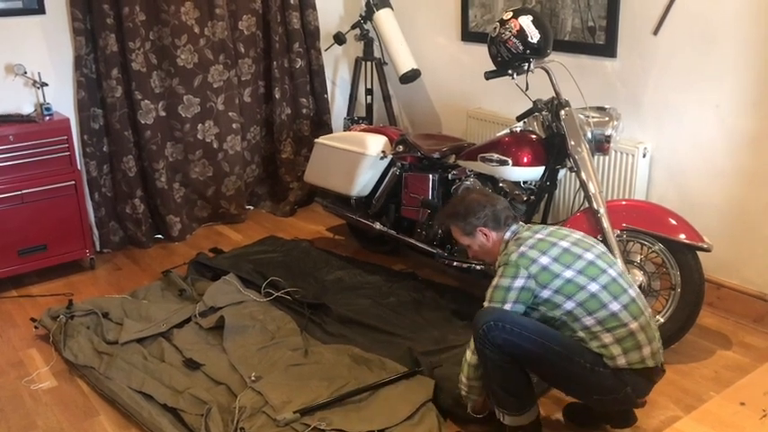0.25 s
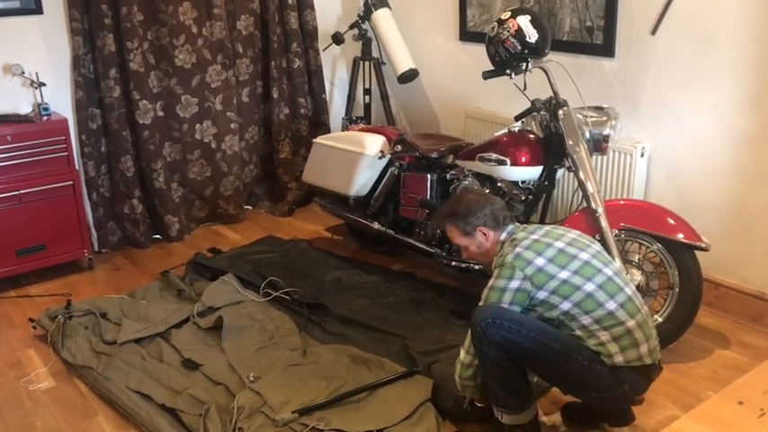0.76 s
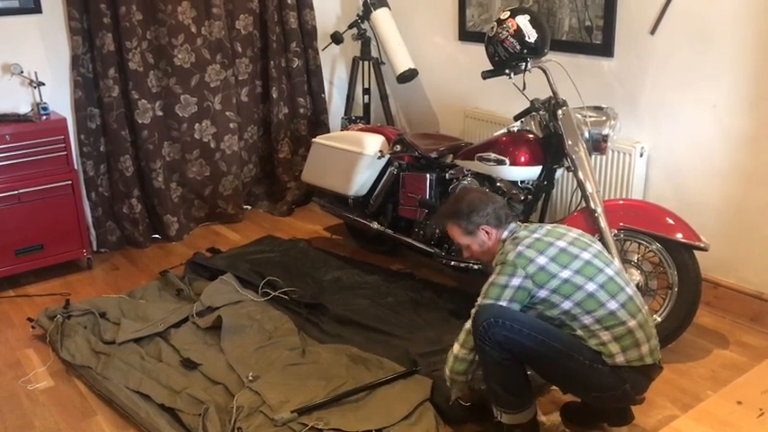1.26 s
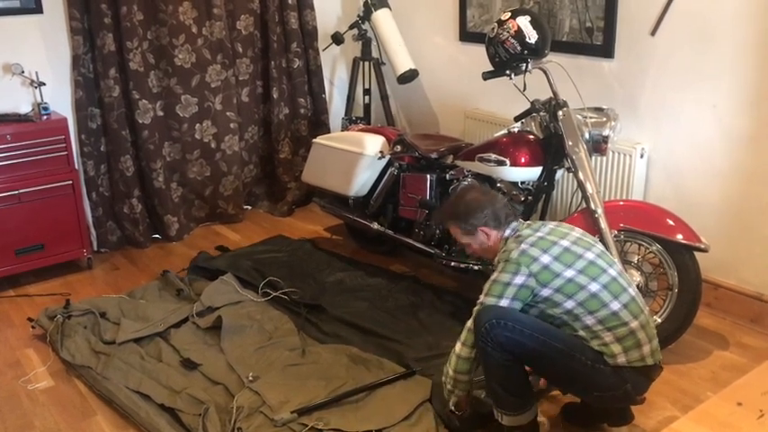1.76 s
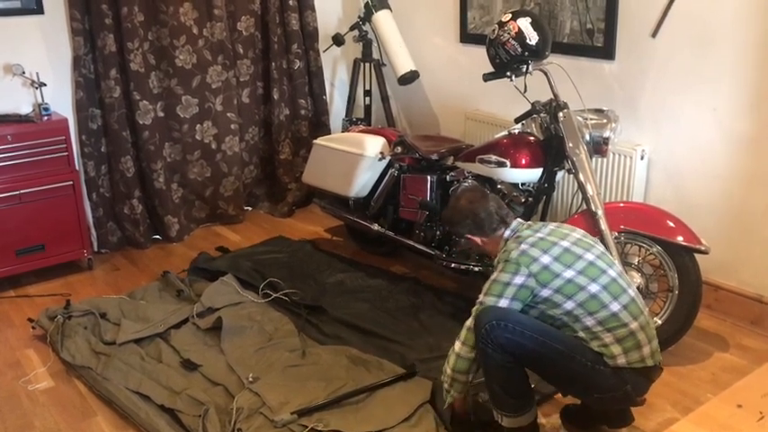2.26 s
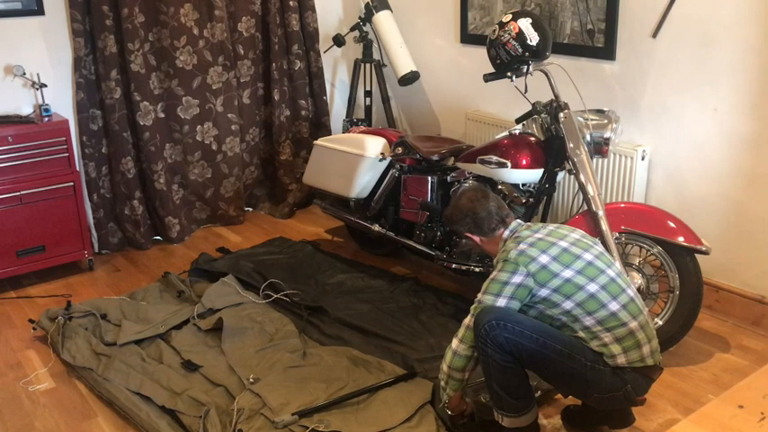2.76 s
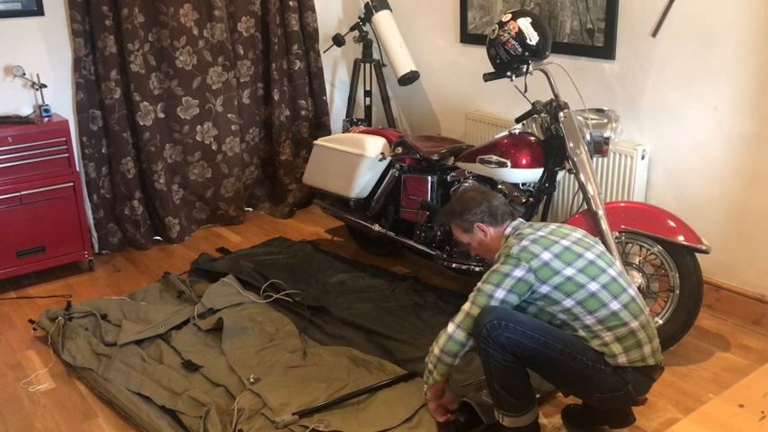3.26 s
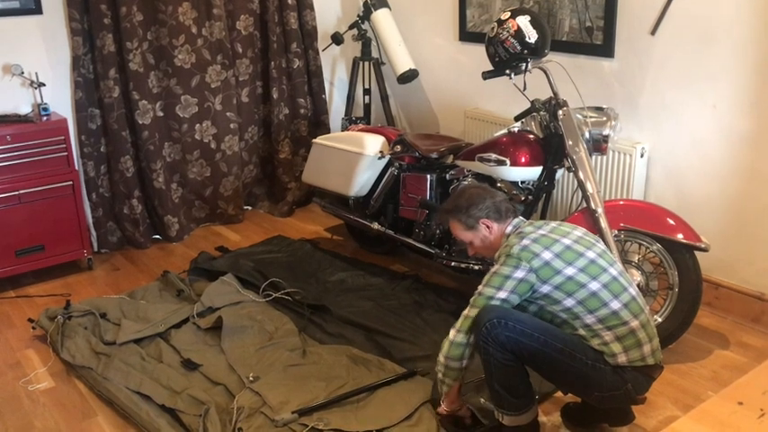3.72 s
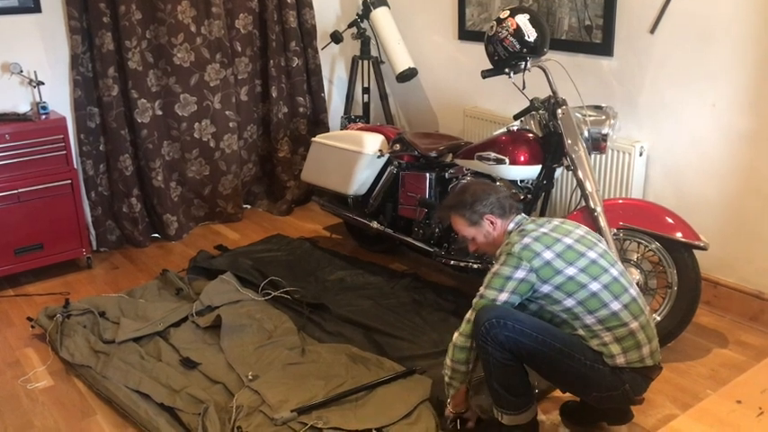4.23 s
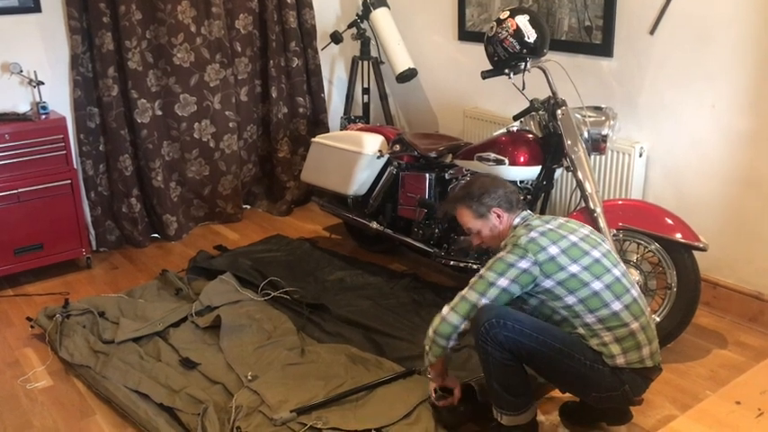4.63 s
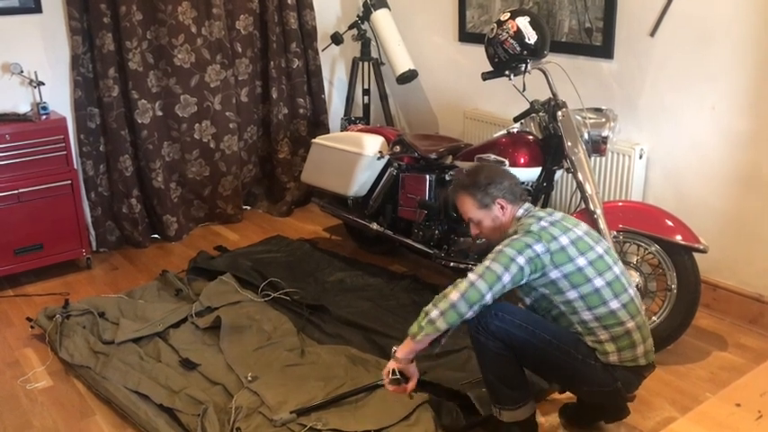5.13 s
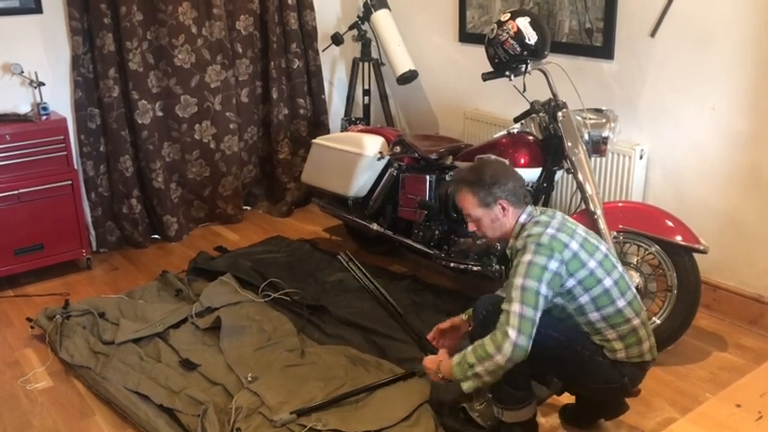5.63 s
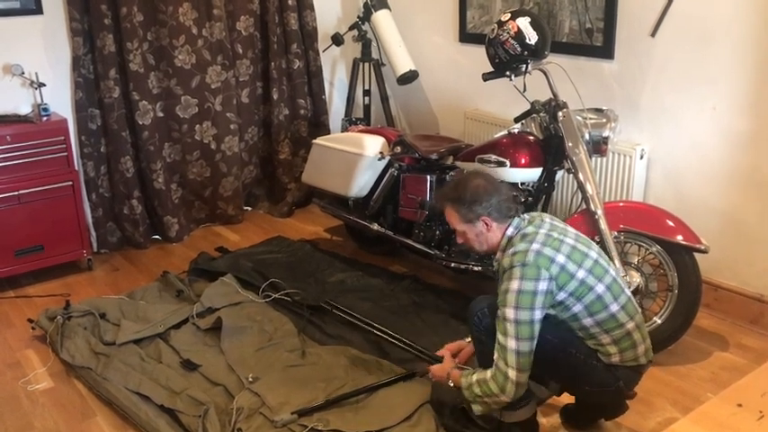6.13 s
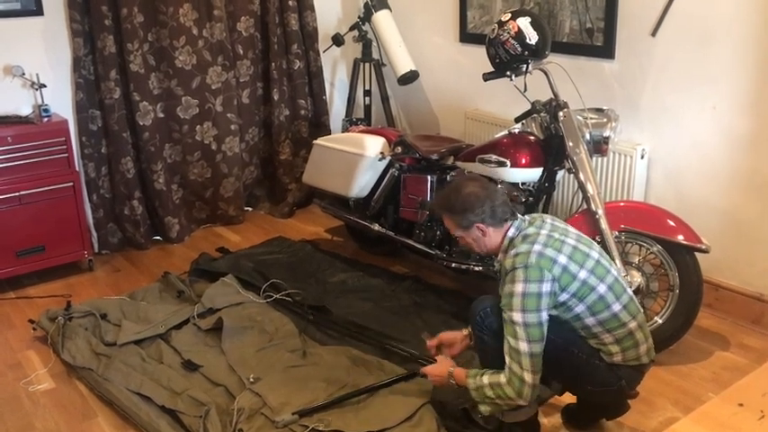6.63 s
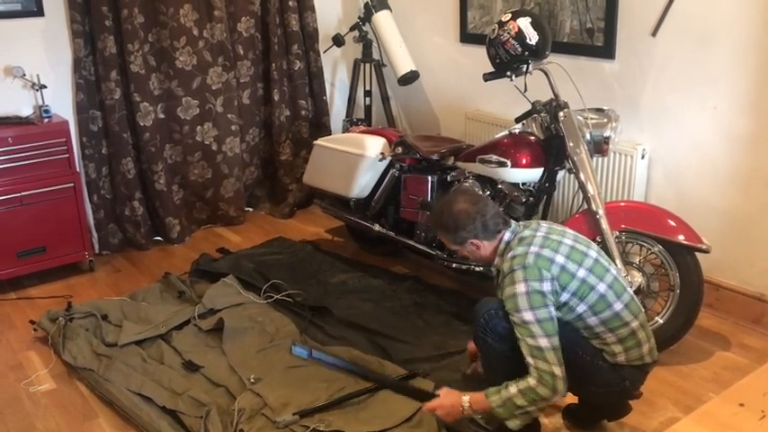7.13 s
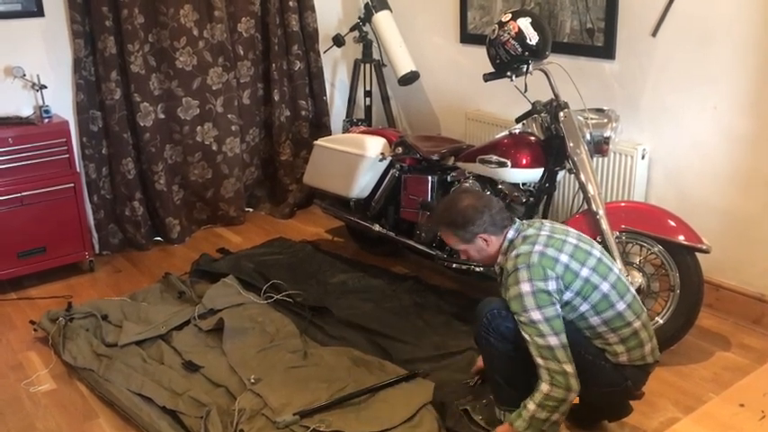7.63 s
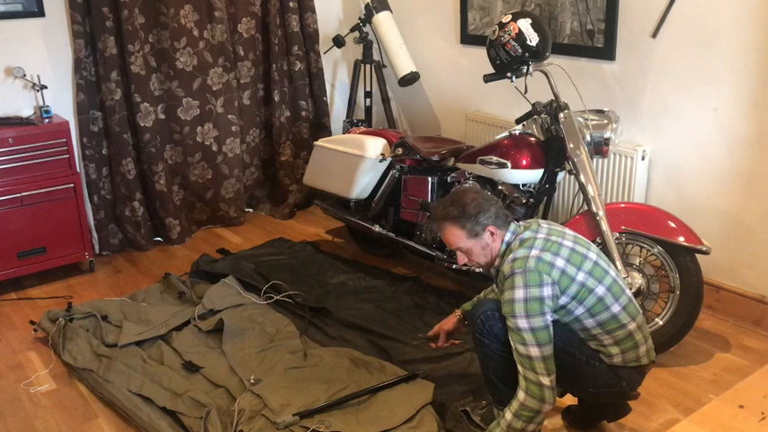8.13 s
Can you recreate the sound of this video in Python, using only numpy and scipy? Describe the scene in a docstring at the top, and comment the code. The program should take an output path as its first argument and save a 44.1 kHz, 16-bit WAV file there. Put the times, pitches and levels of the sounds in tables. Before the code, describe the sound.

Metal tent poles knock, scrape and jingle in a rustling canvas bag on a wooden floor, then clack together in someone's hands in a quiet room.

```python
"""Sorting metal tent poles

Metal tent poles are sorted on a wooden floor in a living room, a few metres away, over faint room noise.
They knock and jingle in a canvas bag, scrape along each other, clack in the hands and land on the boards.
Knocks are short noise bursts plus ringing metal; scrapes and rattles are trains of tiny random pulses.
Canvas is clumps of small snaps and a fine hiss; floor thuds are shaped noise. Both channels are the same.
"""
import sys
import numpy as np
from scipy import signal
from scipy.io import wavfile

SR = 44100
rng = np.random.default_rng(int(sys.argv[2]) if len(sys.argv) > 2 else 0)


def store_wav(level_fs):
    """Save 16-bit WAV to argv[1]."""
    pcm = np.round(np.clip(np.atleast_2d(level_fs), -1, 1) * 32767)
    wavfile.write(sys.argv[1], SR, pcm.T.astype(np.int16))


N = 369602  # length [samples]


def amp(db):
    """Turns decibels into a gain."""
    return 10 ** (np.asarray(db) / 20)


def unit(x):
    """Scales a sound to an rms of one."""
    return x / np.sqrt(np.mean(x ** 2) + 1e-20)


def blow(x):
    """Scales a short sound to the energy of 30 ms at an rms of one."""
    return x * np.sqrt(.03 * SR / (np.sum(x ** 2) + 1e-20))


def read(points, hz):
    """Reads a table between its points, along a log-frequency axis."""
    f, value = np.transpose(points)
    return np.interp(np.log(hz + 1), np.log(f + 1), value)


def add(mix, s, sound):
    """Mixes a sound in at time s [s]."""
    part = mix[max(round(s * SR), 0):][:len(sound)]
    part += sound[:len(part)]


def colour(x, spectrum, size=4096):
    """Filters a sound to the given spectrum, with no sound ahead of its cause (minimum phase)."""
    hz = abs(np.fft.fftfreq(size, 1 / SR))
    log_gain = np.log(amp(read(spectrum, hz)))
    taps = np.fft.ifft(np.exp(np.conj(signal.hilbert(log_gain)))).real
    return signal.oaconvolve(x, taps[:size // 2])[:len(x)]


def resonate(x, hz, width):
    """Passes a sound through one resonance with a gain of one at its peak."""
    return signal.lfilter(*signal.iirpeak(hz, hz / width, SR), x)


def grains(per_s, spread_db):
    """Makes a random train of tiny pulses of uneven size, as from slips or touches."""
    chance = rng.random(N)
    size = np.minimum(rng.exponential(1, N), 4)
    sign = rng.choice([-1, 1], N)
    return unit((chance < per_s / SR) * amp(spread_db * size) * sign)


def unsteady(depth_db, rate_hz):
    """Makes a gain that wanders at random, heading for rate_hz new values a second."""
    knots = rng.standard_normal(4096)
    return amp(depth_db * np.interp(np.arange(N) / SR * rate_hz, np.arange(len(knots)), knots))


def strokes(rows, release_db_per_s, gather=0.61, longest_s=1):
    """The effort of hand movements: each gathers speed, holds and dies away."""
    power, t = np.zeros(N), np.arange(0, longest_s, 1 / SR)
    for start, rise_s, hold_s, db in rows:
        speed = np.minimum(t / max(rise_s, 1 / SR), 1) ** gather
        released_s = np.maximum(t - rise_s - hold_s, 0)
        add(power, start, (speed * amp(db - release_db_per_s * released_s)) ** 2)
    return np.sqrt(power)


# how long the room takes to fade by 60 dB: (frequency [Hz], time [s])
ROOM_FADE = [(80, 0.73), (260, 0.39), (700, 0.35), (1800, 0.36), (5000, 0.41), (10000, 0.28), (16000, 0.23)]


def room(x, wet_db, build_s=0.0025, count=8):
    """Direct sound, a few wall echoes and a diffuse tail, drawn afresh for each call."""
    t = np.arange(24576) / SR
    hz, when, z = signal.stft(rng.standard_normal(len(t)), SR, nperseg=256)
    fade = amp(-60 * when / read(ROOM_FADE, hz)[:, None])
    tail = signal.istft(z * fade, SR, nperseg=256)[1][:len(t)]
    tail *= 1 - np.exp(-t / build_s)
    tail /= np.linalg.norm(tail)
    echo_s = rng.uniform(.002, .035, count)
    tail[(echo_s * SR).astype(int)] += 0.16 * rng.choice([-1, 1], count)
    tail *= amp(wet_db)
    tail[0] += 1  # direct sound
    return signal.fftconvolve(x, tail)[:N]


# colour of the still room: (frequency [Hz], relative level per Hz [dB])
STILL_COLOUR = [(20, -51), (35, -6), (60, -0.5), (130, -10), (190, -10), (290, -7), (450, -17.5),
                (960, -17), (2000, -20.5), (6000, -22), (16000, -27)]


def still_room(level_db=-72):
    """The quiet room is steady noise, shaped to a fixed colour."""
    return amp(level_db) * unit(colour(rng.standard_normal(N), STILL_COLOUR))


def ring(modes, t, ring_s, damping=0.16):
    """Each mode is a narrow band of ringing noise; the high ones die first."""
    out = np.zeros(len(t))
    for hz, width, db in modes:
        noise = rng.standard_normal(len(t))
        cluster = resonate(resonate(noise, hz, width), hz, width)
        cluster = cluster[::-1]  # already at full swing when the blow lands
        t60 = ring_s * (5000 / hz) ** damping  # ring_s is the 60 dB fade time at 5 kHz
        out += amp(db) * blow(cluster * amp(-60 * t / t60))
    return out


def contacts(t, chatter_s, bounce, count=5):
    """One firm contact and a few small bounces that die away."""
    delay = rng.exponential(1, count)
    at = np.clip((delay * chatter_s * SR).astype(int), 1, len(t) - 1)
    train = np.zeros(len(t))
    train[at] = bounce * np.exp(-delay / 2) * rng.choice([-1, 1], count)
    train[0] = 1
    return train / np.linalg.norm(train)


# wall modes of the two tubes: (frequency [Hz], resonator width [Hz], relative level [dB])
SHORT_TUBE = [(3230, 110, -17), (5100, 300, -21), (7350, 120, -8), (9690, 170, -2), (11080, 260, -5),
              (12900, 180, 0), (14910, 260, -1)]
LONG_TUBE = [(3080, 330, -7), (4950, 420, -8), (7060, 250, -1), (9350, 280, 0), (10820, 260, -3),
             (12400, 300, 0), (14780, 300, -1)]
# bending modes of a pole: (frequency [Hz], resonator width [Hz], relative level [dB])
BENDING = [(298, 42, -12.5), (966, 126, -2), (1915, 510, 5.5), (3104, 490, 6), (4640, 130, 1.5),
           (5760, 350, -18), (6220, 370, -1.5)]
# colour of the contact tick: (frequency [Hz], relative level per Hz [dB])
TICK_COLOUR = [(300, -41), (2000, -17.5), (4500, 0), (7000, 4), (10000, 0.5), (13000, -4), (16000, 0.5)]


def pole_hits(rows, body, body_db, body_s, bend_db, tick_db, tick_s,
              short_db, long_db, rise_s, chatter_s, bounce, wet_db):
    """Every contact gives a knock, a bright tick and the ring of both tubes."""
    out, t = np.zeros(N), np.arange(10000) / SR
    for s, knock, tick, ring_db, share in rows:
        share = np.clip(share, .01, .99)
        short, long = ring_db + 10 * np.log10([1 - share, share])
        push = rng.standard_normal(len(t)) * np.exp(-t / body_s)
        grit = rng.standard_normal(len(t)) * np.exp(-t / tick_s)
        parts = [(knock + body_db, colour(push, body)),
                 (knock + bend_db, ring(BENDING, t, ring_s=0.04)),
                 (short + short_db, ring(SHORT_TUBE, t, ring_s=0.078)),
                 (long + long_db, ring(LONG_TUBE, t, ring_s=0.26))]
        attack = 1 - np.exp(-t / rise_s)  # vibration takes a moment to spread along the poles
        hit = sum(amp(db) * blow(part * attack) for db, part in parts)
        hit += amp(tick + tick_db) * blow(colour(grit, TICK_COLOUR))  # the contact itself is instant
        bounced = signal.fftconvolve(hit, contacts(t, chatter_s, bounce))[:len(t)]
        add(out, s, room(bounced, wet_db))
    return out


# poles knocking in the bundle on the floor:
# (time [s], relative knock [dB], relative tick [dB], relative ring [dB], long tube's share of the ring [0-1])
FLOOR_KNOCKS = [(0.0, -25.5, -70, -49.5, 1), (0.044, -26.5, -70, -57, .9), (0.375, -52.5, -53, -59, 0.6),
                (0.719, -51, -69, -68, .1), (0.741, -47, -59, -61, 0.4), (0.865, -47.5, -58, -74, .5),
                (0.934, -60, -71, -80, .5), (1.013, -41, -60, -78, .3), (1.225, -34, -44, -43.5, 1),
                (1.26, -35.5, -36.5, -47, .3), (1.476, -49, -49, -50.5, .5), (2.124, -42, -48, -70, .5),
                (2.607, -53, -78.5, -87, .5), (3.044, -35.5, -48, -59, 0.2), (3.082, -37.5, -41, -42, 0),
                (3.196, -41.5, -31.5, -54, 0.8), (3.307, -35, -37, -52, 0.8), (3.511, -36, -33, -52, 1),
                (3.571, -41, -38, -40.5, 0.35), (3.821, -53, -47.5, -58, 0), (4.067, -38.5, -40.5, -52, 0),
                (4.124, -39.5, -39.5, -59, .4), (4.174, -39, -36, -57, 0.4),
                (4.195, -31.5, -23.5, -27.5, 0.01), (4.218, -32.5, -48, -61, .3),
                (4.288, -39, -56, -66, .5), (4.384, -38.5, -39, -37, 0.6), (4.436, -59, -41, -33, 0.14),
                (4.471, -34, -34, -39, 0.2), (4.525, -30, -30.5, -40.5, 0), (4.962, -45.5, -30.5, -63, .4),
                (4.995, -40, -30.5, -48, 0.7), (5.516, -63, -68, -82, .3), (5.607, -57, -77, -92, .5),
                (5.816, -56, -81, -90, .5), (7.374, -42.5, -42, -36, 0.1), (7.385, -53, -36, -31.5, 0),
                (7.399, -63, -40, -26.5, 0), (7.528, -64, -38.5, -45, .95), (7.595, -66, -43, -53.5, .9)]
# colour of these knocks: (frequency [Hz], relative level per Hz [dB])
FLOOR_BODY = [(60, -25), (250, -17.5), (450, -9.5), (800, -4.5), (1500, 4), (2400, 2.5), (3700, 2.5),
              (4700, -5), (8000, -18.5), (16000, -6)]


def bundle_knocks():
    """Poles in the bundle knock together: a slightly softened start, with bounces spread out in time."""
    return pole_hits(FLOOR_KNOCKS, FLOOR_BODY, body_db=-12.5, body_s=0.0029, bend_db=-19.5,
                     tick_db=-14.5, tick_s=0.0023, short_db=-7.0, long_db=-6.0,
                     rise_s=0.0017, chatter_s=.012, bounce=0.21, wet_db=1.5)


# tugs at the canvas: (start [s], rise [s], hold [s], relative level [dB])
CANVAS_TUGS = [(0.0, 0.0043, 0.15, -49.5), (0.365, 0.011, 0.043, -55.5), (0.57, 0.013, 0.041, -54.5),
               (0.71, 0.0097, 0.021, -50.5), (0.85, 0.028, 0.11, -52.5), (1.195, 0.029, 0.046, -45),
               (1.3, 0.13, 0.097, -49), (1.58, 0.13, 0.29, -57.5), (2.03, 0.063, 0.042, -46),
               (2.24, 0.15, 0.032, -55.5), (2.68, 0.16, 0.055, -47.5), (3.0, 0.15, 0.026, -41),
               (3.23, 0.074, 0.026, -42), (3.49, .03, 0.24, -55.5), (3.76, 0.027, 0.44, -56),
               (4.13, .09, 0.05, -41), (4.38, .01, 0.0071, -48), (4.45, 0.17, 0.23, -52),
               (4.92, 0.1, 0.028, -56), (5.235, 0.0067, 0.013, -63), (5.58, 0.017, 0.49, -74),
               (7.3, .02, 0.036, -69), (7.373, 0.0033, 0.044, -58), (7.525, .005, 0.022, -55.5)]
# a sleeve brushing over the bag: (start [s], rise [s], hold [s], relative level [dB])
SLEEVE_BRUSHES = [(1.33, 0.14, .04, -56.5), (1.6, 0.37, .24, -55.5), (2.24, 0.036, 0.089, -66)]
# colours of the snapping folds and the cloth hiss: (frequency [Hz], relative level per Hz [dB])
CRUMPLE_COLOUR = [(25, -45), (50, 1), (80, 6), (170, -5), (270, -0.5), (450, -6.5), (750, 0), (1250, 1.5),
                  (1700, -0.5), (2600, -3.5), (4000, -6), (8000, -13.5), (16000, -27.5)]
SWISH_COLOUR = [(300, 7.5), (2000, 3.5), (6000, 4.5), (10000, 1.5), (13000, 2.5), (16000, 2.5)]
# resonances of the folds: one frequency [Hz] per fold
FOLD_HZ = np.geomspace(350, 2800, 8)


def canvas(crumple_db=-5, swish_db=-2, fold_db=-9, fold_q=5):
    """Folds buckle in clumps of small snaps and resonate by turns; cloth on cloth adds a fine hiss."""
    handling = strokes(CANVAS_TUGS, release_db_per_s=108)
    brushing = strokes(SLEEVE_BRUSHES, release_db_per_s=168)
    clumps = grains(per_s=1500, spread_db=2.5) * unsteady(depth_db=0.5, rate_hz=50)
    snaps = unit(colour(clumps, CRUMPLE_COLOUR))
    folds = sum(unsteady(depth_db=2.5, rate_hz=20) * resonate(snaps, hz, hz / fold_q) for hz in FOLD_HZ)
    crumple = unit(snaps + amp(fold_db) * folds)
    hiss = unit(colour(rng.standard_normal(N), SWISH_COLOUR))
    rustle = amp(crumple_db) * handling * crumple
    swish = amp(swish_db) * brushing * hiss
    return room(rustle + swish, wet_db=-4)


# weight landing on the floorboards: (time [s], relative deep boom [dB], relative hollow knock [dB])
THUDS = [(0.009, -44, -43.5), (0.595, -55.5, -72), (0.729, -55, -55), (0.879, -55, -70),
         (1.074, -53.5, -80), (2.068, -62, -51.5), (2.14, -41, -52), (2.387, -45, -60), (2.619, -46, -57),
         (2.774, -58, -75), (3.05, -51, -73), (3.527, -41, -56), (4.04, -50.5, -55.5), (4.221, -45, -50),
         (4.397, -55, -51.5), (4.53, -44, -51.5), (4.982, -52, -57), (5.603, -53, -66.5), (5.681, -53, -68),
         (5.789, -59.5, -72), (7.39, -49, -61), (7.448, -52, -55.5), (7.595, -50.5, -55.5)]
# colours of the boom and the hollow knock above it: (frequency [Hz], relative level per Hz [dB])
BOOM_COLOUR = [(25, -34), (45, -35), (68, 0.5), (88, -2), (120, -11.5), (180, -14.5), (500, -49)]
HOLLOW_COLOUR = [(60, -29.5), (120, -1.5), (170, -7.5), (205, -3.5), (260, 2.5), (350, -6.5), (480, -12),
                 (700, -8.5), (2000, -40.5)]


def floorboards(boom_s=0.019, boom_db=-7, hollow_s=0.042, hollow_db=-2):
    """Shifting feet and dropped poles make the boards boom briefly."""
    out, t = np.zeros(N), np.arange(12000) / SR
    for s, boom, hollow in THUDS:
        heavy = rng.standard_normal(len(t)) * np.exp(-t / boom_s)
        light = rng.standard_normal(len(t)) * np.exp(-t / hollow_s)
        thud = amp(boom + boom_db) * blow(colour(heavy, BOOM_COLOUR))
        thud += amp(hollow + hollow_db) * blow(colour(light, HOLLOW_COLOUR))
        add(out, s, room(thud, wet_db=-4))
    return out


# a pole sliding along the others, one row a stroke: (start [s], rise [s], hold [s], relative level [dB])
SCRAPES = [(0.863, 0.0022, 0.0089, -49), (2.72, 0.018, 0.2, -53.5), (3.03, 0.097, 0.024, -41),
           (3.2, 0.023, 0.15, -45.5), (3.465, 0.056, 0.028, -49.5), (4.45, .03, 0.023, -42),
           (4.55, 0.23, 0.19, -42.5), (4.96, 0.0043, 0.064, -39), (5.24, 0.013, 0.022, -64.5)]
# resonances that sliding wakes in the tube: (frequency [Hz], width [Hz], relative level [dB])
SCRAPE_MODES = [(3180, 290, -5), (4530, 100, -4), (6133, 164, 4), (6000, 200, -7), (6610, 230, 2),
                (7000, 120, -15), (7250, 140, -13), (7480, 160, -24), (8360, 360, -9), (10900, 270, -8),
                (11800, 140, -3), (12500, 200, -19), (13700, 240, -17), (15000, 36, -10)]
# dry grit of the contact: (frequency [Hz], relative level per Hz [dB])
GRIT_COLOUR = [(300, -13.5), (1500, 0), (3600, 2.5), (5500, 5), (7000, -6.5), (10000, -3), (13000, -31),
               (16000, -16)]
SLIDE_STOP_DB_PER_S = 265  # how fast a scrape or drag dies away


def scrape(scrape_db=-3, grit_db=-11):
    """Metal catches and slips on metal, ringing the tube; its modes swell and fade as the contact travels."""
    slips = grains(per_s=7000, spread_db=5.5) * unsteady(depth_db=1.0, rate_hz=70)
    tube = np.zeros(N)
    for hz, width, db in SCRAPE_MODES:
        tube += amp(db) * unsteady(depth_db=4.0, rate_hz=16) * resonate(slips, hz, width)
    rough = unit(tube + amp(grit_db) * colour(slips, GRIT_COLOUR))
    return room(amp(scrape_db) * strokes(SCRAPES, SLIDE_STOP_DB_PER_S) * rough, wet_db=-5.5)


# pole ends landing on the bare boards: (time [s], relative level [dB])
LANDINGS = [(2.073, -48), (4.389, -46), (7.375, -47.5), (7.445, -51), (7.529, -54)]
# the bundle dragged over the boards: (start [s], rise [s], hold [s], relative level [dB])
DRAGS = [(2.06, 0.015, 0.058, -54.5), (2.24, 0.07, 0.075, -57)]
# what the boards ring with under a pole end: (frequency [Hz], resonator width [Hz], relative level [dB])
BOARD_MODES = [(306, 71, -7), (786, 350, -8.5), (964, 180, 0.5), (1356, 120, -3.5), (1710, 190, -5)]


def landings_and_drags(board_db=-4, board_s=0.025, drag_db=-2):
    """A pole end dropped on wood gives a short, dry clack; dragging rubs the same board modes."""
    out, t = np.zeros(N), np.arange(6000) / SR
    for s, db in LANDINGS:
        clack = amp(db + board_db) * blow(ring(BOARD_MODES, t, ring_s=board_s))
        add(out, s, room(clack, wet_db=0))
    slips = grains(per_s=3700, spread_db=2.0)
    rub = unit(sum(amp(db) * resonate(slips, hz, width) for hz, width, db in BOARD_MODES))
    return out + room(amp(drag_db) * strokes(DRAGS, SLIDE_STOP_DB_PER_S) * rub, wet_db=-2.5)


# poles clacking together in the hands:
# (time [s], relative knock [dB], relative tick [dB], relative ring [dB], long tube's share of the ring [0-1])
HAND_CLACKS = [(6.0035, -45, -38, -44, 0), (6.052, -37.5, -44.5, -54, .8), (6.132, -30.5, -40, -61, .9),
               (6.159, -27.5, -33.5, -49, .8), (6.316, -42, -51, -44, 0.5), (6.356, -27.5, -46, -45.5, 0),
               (6.4, -41, -49, -65, .2), (6.434, -33.5, -45.5, -70, .7), (6.484, -48, -40, -42, 0.5),
               (6.517, -28.5, -33.5, -69, .6), (6.614, -35, -40, -46, 0.1), (6.657, -30.5, -30.5, -50, 0.7),
               (6.781, -48, -45, -47, 0.3), (6.811, -45, -46.5, -58, .2), (7.014, -54.5, -45, -50, 0.07),
               (7.129, -64, -60, -61, 0.8), (7.718, -53.5, -48, -49.5, 1), (7.778, -53, -48, -46, .8),
               (7.884, -67, -52, -54.5, 0.2), (7.971, -55, -47, -37, .7), (7.988, -47, -38, -46, 0.6),
               (8.116, -57, -49, -58, .9), (8.334, -60, -55.5, -75, 0.2)]
# colour of these clacks: (frequency [Hz], relative level per Hz [dB])
HAND_BODY = [(100, -26), (550, -23.5), (850, 1), (2500, 6.5), (4000, 4.5), (8000, -4), (16000, -32)]


def hand_clacks():
    """Poles clack together in the hands: a sharp start, with bounces close together."""
    return pole_hits(HAND_CLACKS, HAND_BODY, body_db=-20.5, body_s=0.0015, bend_db=-20.5,
                     tick_db=-11.5, tick_s=0.0021, short_db=-6.5, long_db=-5,
                     rise_s=0.0001, chatter_s=.005, bounce=0.23, wet_db=1.0)


# held poles chattering between the firm clacks: (start [s], rise [s], hold [s], relative level [dB])
RATTLES = [(6.13, 0.015, 0.027, -49.5), (6.28, 0.058, 0.26, -54.5), (6.6, 0.021, 0.037, -47.5)]


def rattle(rattle_db=-2, grit_db=-7):
    """Loosely held poles touch hundreds of times a second, which keeps their bending modes sounding."""
    touches = grains(per_s=500, spread_db=2.0)
    tube = np.zeros(N)
    for hz, width, db in BENDING:
        tube += amp(db) * resonate(resonate(touches, hz, width), hz, width)
    chatter = unit(tube) + amp(grit_db) * unit(colour(touches, HAND_BODY))
    return room(amp(rattle_db) * strokes(RATTLES, release_db_per_s=202) * chatter, wet_db=-3.0)


def scene():
    """Poles, canvas and floor over the still room, the same in both channels."""
    floor = bundle_knocks() + floorboards() + landings_and_drags()
    hands = hand_clacks() + rattle()
    return np.tile(still_room() + floor + canvas() + scrape() + hands, (2, 1))


def record(dry):
    """A steep low-pass filter removes the highest treble."""
    taps = signal.firwin(511, 15750, window=("kaiser", 9), fs=SR)  # cutoff in Hz
    return signal.oaconvolve(dry, taps[None], "same")


dry = scene()
out = record(dry)
store_wav(out)
```